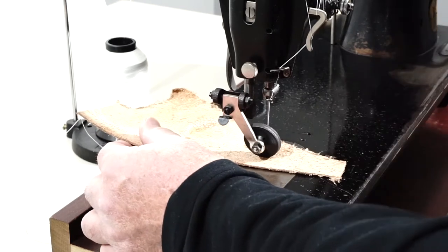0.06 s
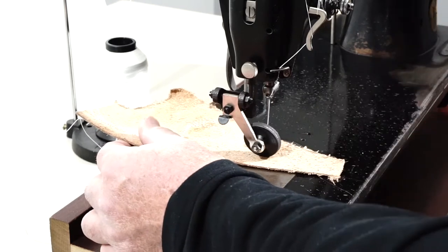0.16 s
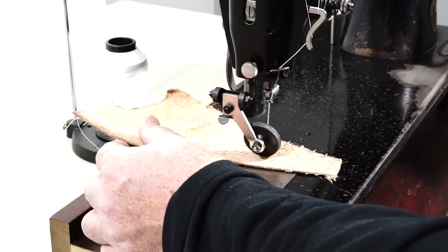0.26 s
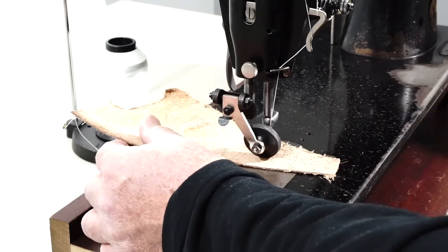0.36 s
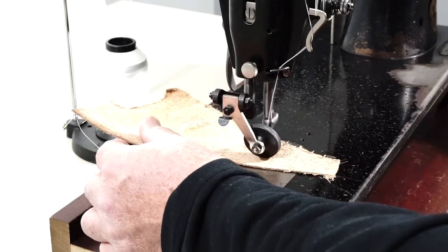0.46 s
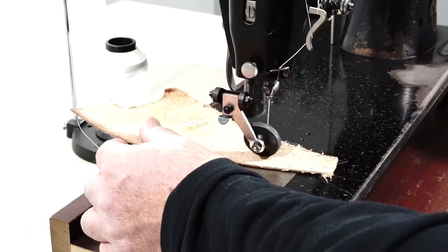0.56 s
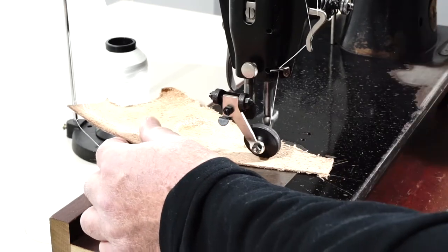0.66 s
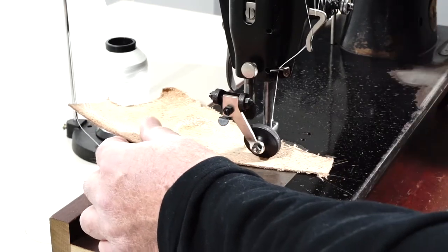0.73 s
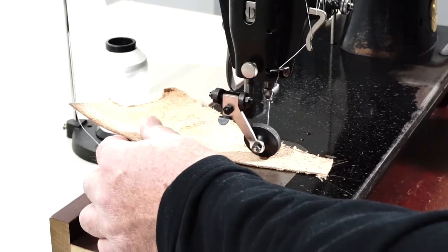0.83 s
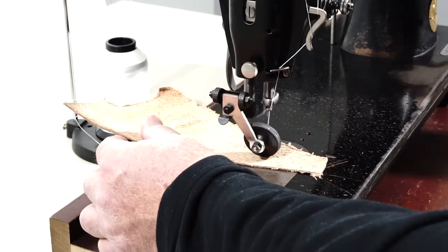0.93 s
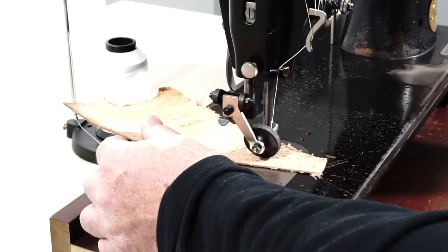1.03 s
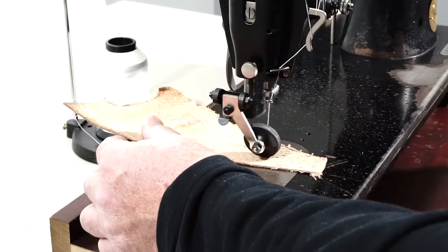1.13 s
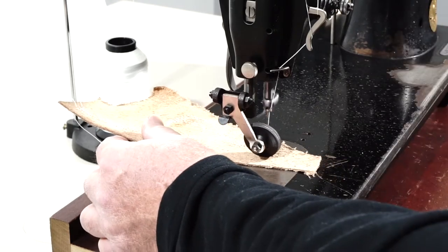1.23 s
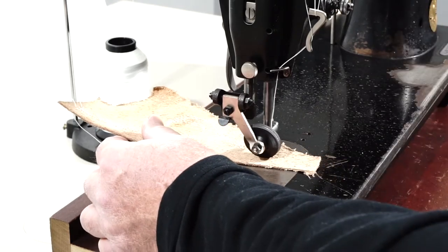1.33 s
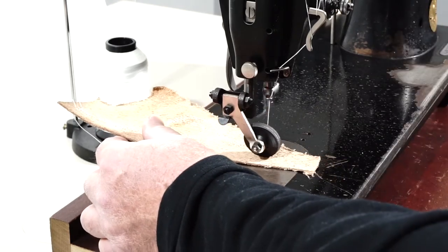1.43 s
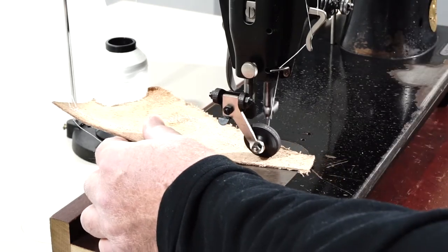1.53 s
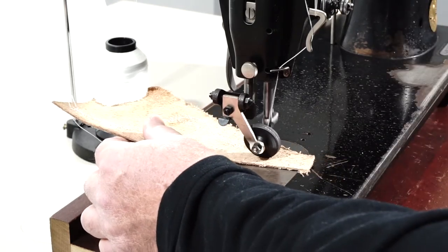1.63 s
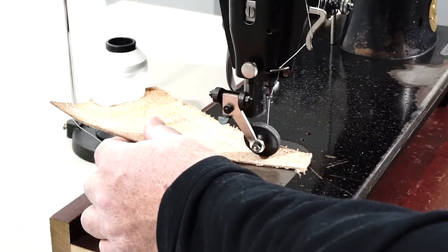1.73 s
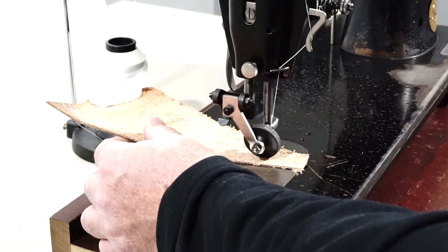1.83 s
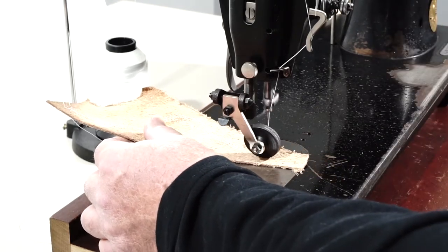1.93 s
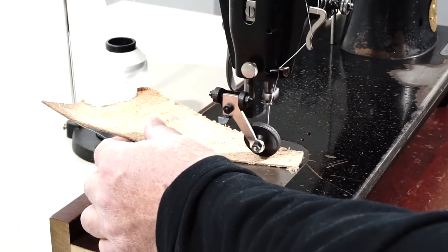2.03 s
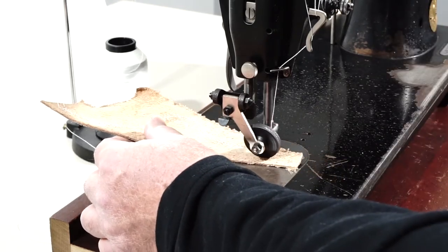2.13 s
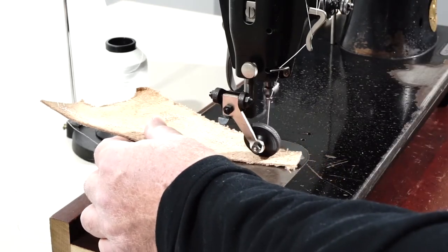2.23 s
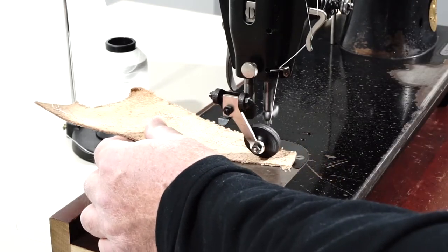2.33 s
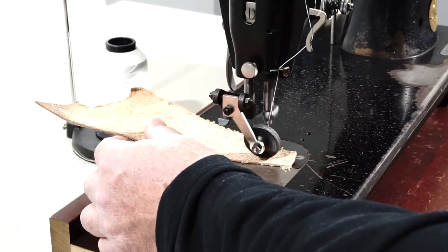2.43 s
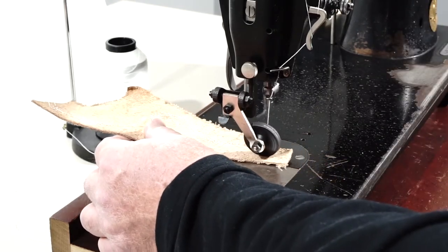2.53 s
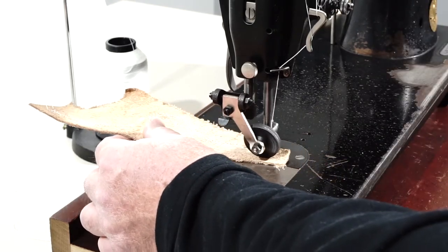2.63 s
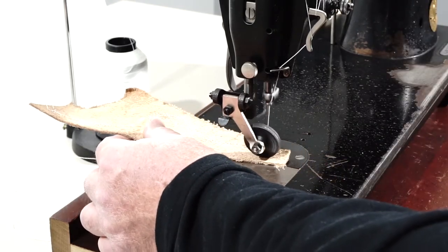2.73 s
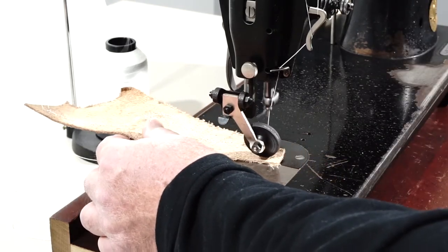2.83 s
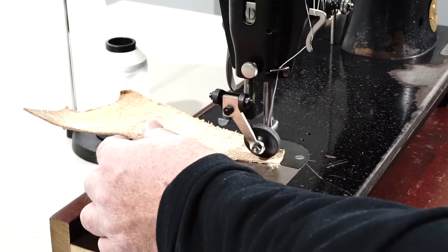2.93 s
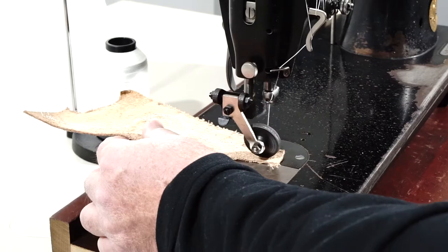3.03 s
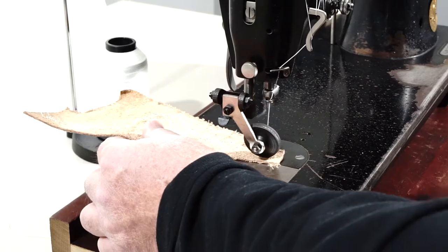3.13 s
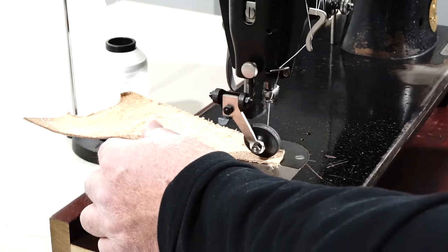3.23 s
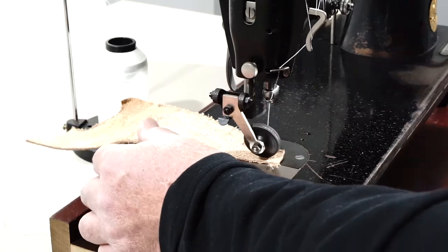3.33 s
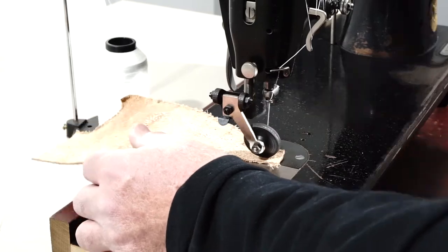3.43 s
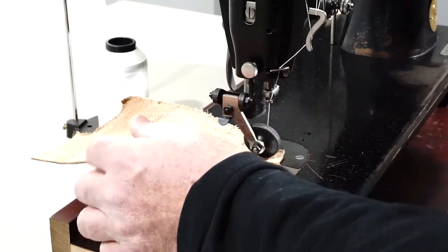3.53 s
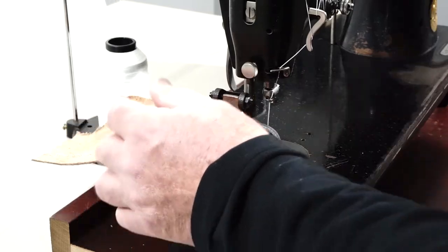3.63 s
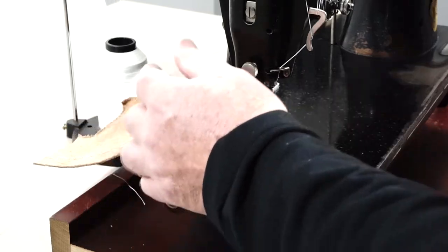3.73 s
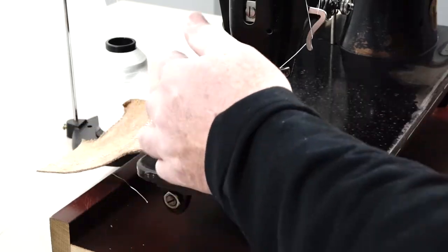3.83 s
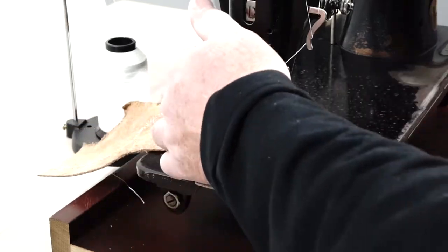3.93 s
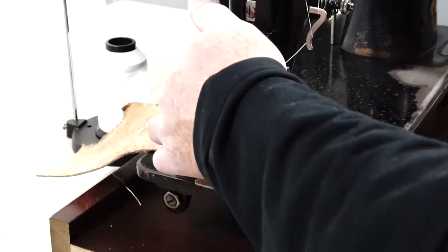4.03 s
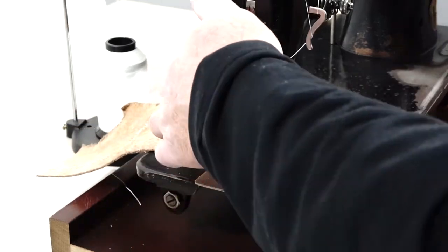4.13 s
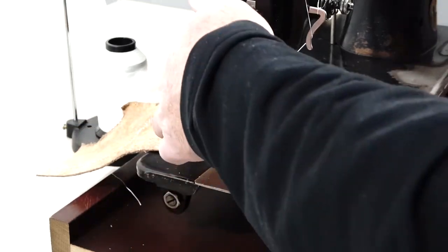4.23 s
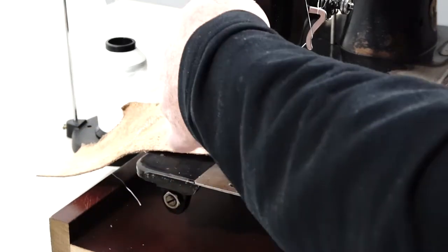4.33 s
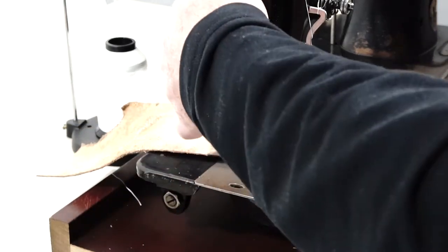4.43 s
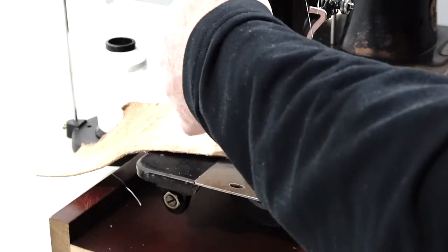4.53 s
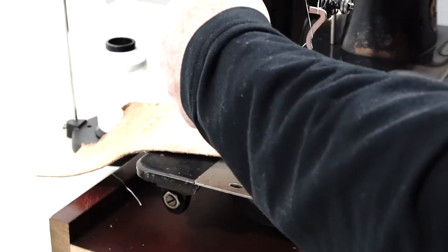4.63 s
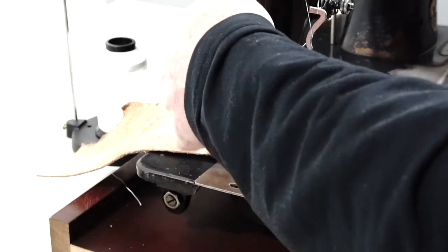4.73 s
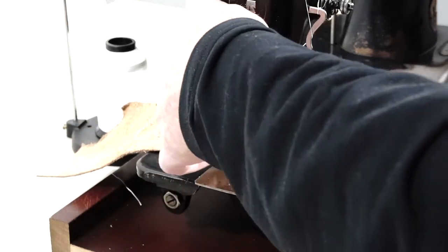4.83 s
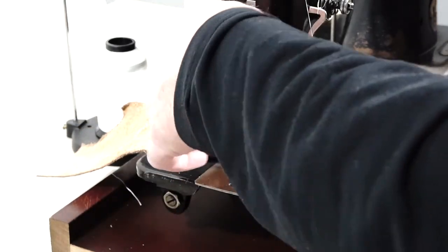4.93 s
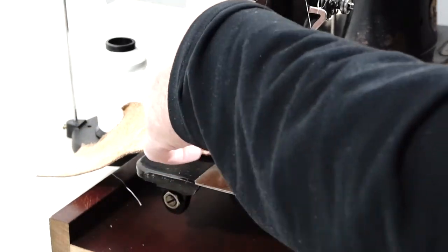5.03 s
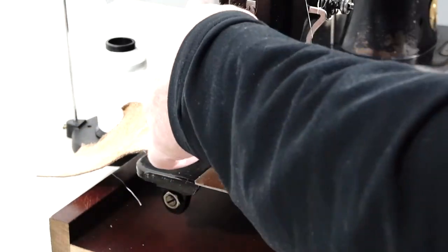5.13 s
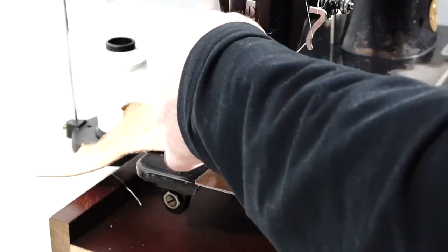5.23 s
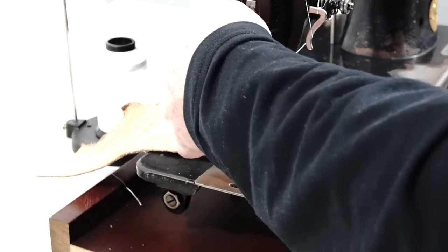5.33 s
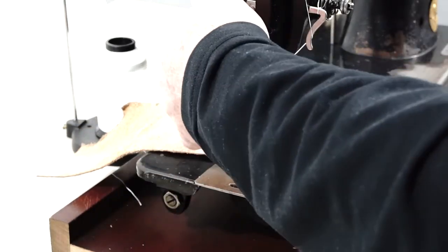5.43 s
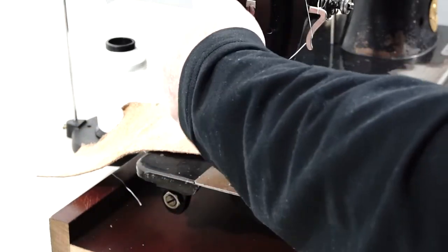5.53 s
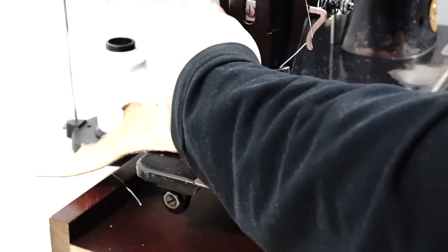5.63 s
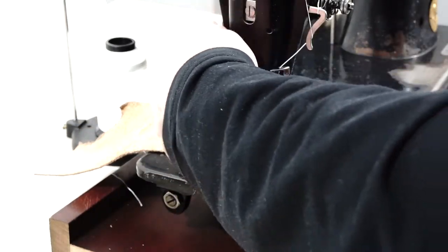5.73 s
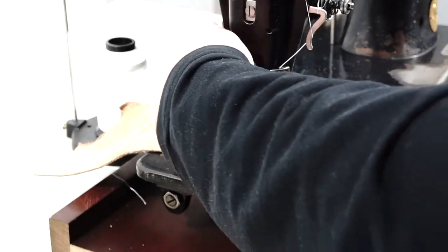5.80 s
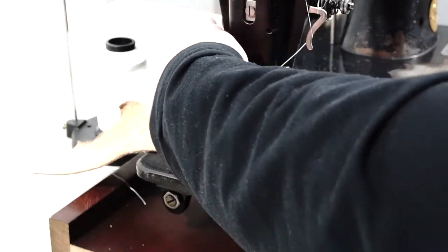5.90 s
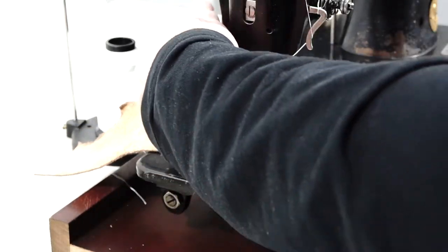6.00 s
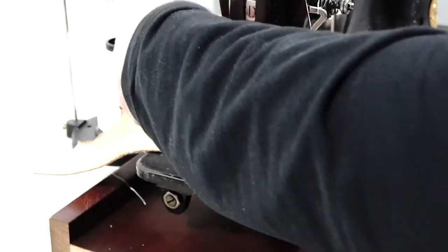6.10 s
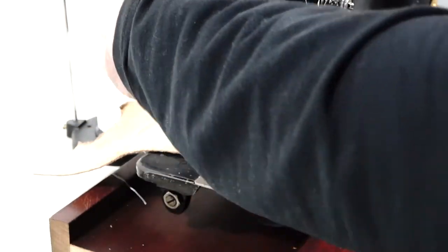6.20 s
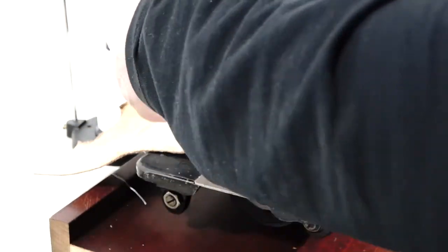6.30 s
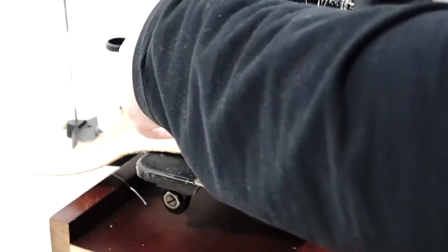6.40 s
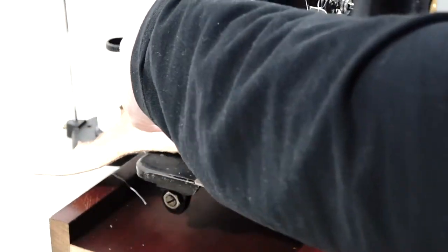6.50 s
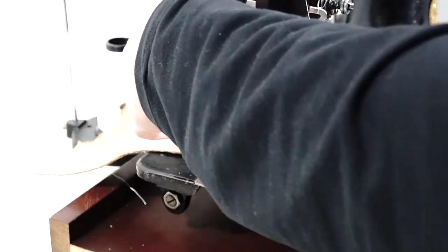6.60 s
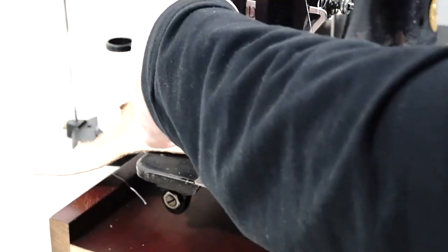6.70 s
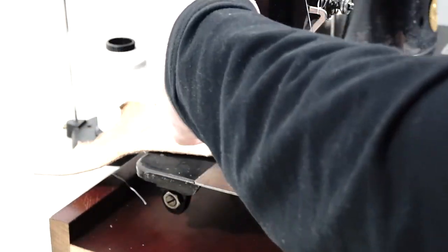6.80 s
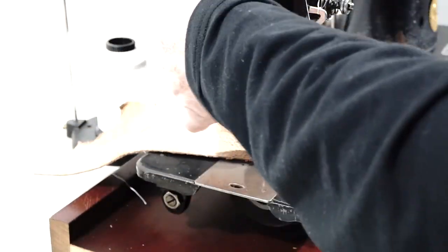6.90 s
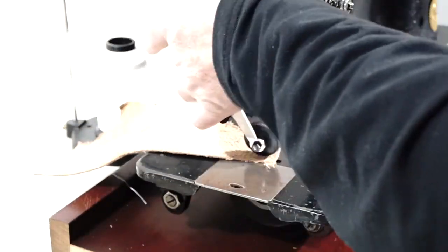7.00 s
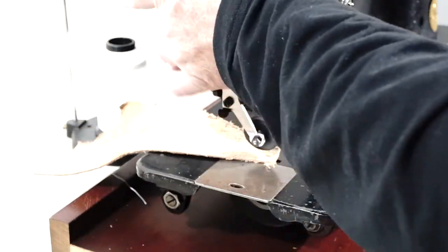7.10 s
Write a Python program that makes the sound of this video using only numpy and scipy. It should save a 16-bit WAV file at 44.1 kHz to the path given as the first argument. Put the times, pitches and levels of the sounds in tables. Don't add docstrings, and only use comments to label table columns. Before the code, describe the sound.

A heavy sewing machine clatters through leather at about four stitches a second, brakes with a metallic clank, then hand knocks and quiet rumble follow.

```python
import sys
import numpy as np
from scipy import signal
from scipy.fft import rfft, irfft, next_fast_len
from scipy.io import wavfile

SR = 44100
rng = np.random.default_rng(int(sys.argv[2]) if len(sys.argv) > 2 else 0)


def wrap_up_sound(samples):
    columns = np.atleast_2d(samples).T
    tamed = np.clip(columns, -1, 1)
    steps = np.round(tamed * 32767).astype(np.int16)
    wavfile.write(sys.argv[1], SR, steps)


def invert_db(level):
    return 10 ** (np.asarray(level, dtype=float) / 20)


N = 315756
T = np.arange(N) / SR
RUNNING = round(3.3 * SR)


def rms_one(x):
    return x / np.sqrt(np.mean(x ** 2) + 1e-20)


def in_time(rows):
    s, *columns = np.transpose(rows)
    return [np.interp(T, s, c) for c in columns]


def gate(start_s, stop_s, fade_s):
    return np.clip(np.minimum(T - start_s, stop_s - T) / fade_s + 1, 0, 1) ** 2


def stroke(s, db, hold, rise, fall, t=T):
    before = (s - t) / max(rise, 1e-3)
    after = (t - s - hold) / max(fall, 1e-3)
    return invert_db(db - 20 * np.maximum(np.maximum(before, after), 0))


def strokes(table):
    return sum(stroke(*row) for row in table)


def on_log_axis(hz, points):
    table_hz, values = np.transpose(points)
    return np.interp(np.log(hz), np.log(table_hz), values)


def at_hz(points, size):
    return on_log_axis(np.maximum(np.fft.rfftfreq(size, 1 / SR), 1), points)


def band_pass(order, low_hz, high_hz, x):
    return signal.sosfilt(signal.butter(order, [low_hz, high_hz], "band", fs=SR, output="sos"), x)


def colour(x, points):
    size = next_fast_len(x.shape[-1])
    return rms_one(irfft(rfft(x, size) * invert_db(at_hz(points, size)), size)[..., :x.shape[-1]])


def drift(rate_hz, size=N):
    r = np.exp(-80 * np.pi * rate_hz / SR)
    slow = signal.lfilter([1], [1, -2 * r, r * r], rng.standard_normal(size // 40 + 2002))[2000:]
    return np.interp(np.arange(size) / 40, np.arange(len(slow)), rms_one(slow))


def grains(per_s, spread_db, size=N):
    sizes = invert_db(spread_db * np.minimum(rng.exponential(1, size), 5)) * rng.standard_normal(size)
    return rms_one(sizes * (rng.random(size) < per_s / SR))


def resonate(x, peaks, flicker_db):
    out = 0
    for k, (hz, width_hz, db) in enumerate(peaks):
        r, w = np.exp(-np.pi * width_hz / SR), 2 * np.pi * hz / SR
        rung = rms_one(signal.lfilter([1, 0, -1], [1, -2 * r * np.cos(w), r * r], x))
        out = out + (-1) ** k * invert_db(db + flicker_db * drift(9.2, size=len(x))) * rung
    return rms_one(out)


def clicks_at(times, dbs):
    clicks = np.full(N, 1e-18)
    clicks[np.round(times * SR).astype(int)] = invert_db(dbs)
    return clicks


def until_dead(times):
    return slice(int(min(times) * SR), int((max(times) + .5) * SR))


def strike(times, dbs, modes, scatter_db, clatter_s, loose=1):
    out, luck = np.zeros(N), rng.standard_normal((len(times), len(modes)))
    heard = until_dead(times)
    fall, rough = invert_db(-60 / (clatter_s * SR)), rng.standard_normal(len(out[heard]))
    for k, (hz, db, t60) in enumerate(modes):
        clicks = clicks_at(times, dbs + db + scatter_db * luck[:, k])[heard]
        decay = signal.lfilter([np.sqrt(1 - fall ** 2)], [1, -fall], clicks)
        clatter = clicks + decay * rough * loose
        r, w = invert_db(-60 / (t60 * SR)), 2 * np.pi * hz / SR
        out[heard] += signal.lfilter([0, np.sin(w)], [1, -2 * r * np.cos(w), r * r], clatter)
    return out


def burst(times, dbs, low_hz, high_hz, t60):
    out, heard = np.zeros(N), until_dead(times)
    fall = signal.lfilter([1], [1, -invert_db(-60 / (t60 * SR))], clicks_at(times, dbs)[heard])
    noise = rng.standard_normal(len(fall))
    out[heard] = fall * rms_one(band_pass(2, low_hz, min(high_hz, .45 * SR), noise))
    return out


# (frequency [Hz], width [Hz], level [dB])
TABLE_MODES = [(166, 47, -7), (211, 19, -2.5)]
# (time [s], level [dB], hold [s], rise [s per 20 dB], fall [s per 20 dB])
CLUTCH_JOLT = (-0.04, -41.5, 0.32, 2, 0.7)


def table_boom(turns, peak_db, teeth):
    main_share, hold, rise, fall = 0.46, 0.093, 0.13, 0.19
    fore_share, fore_db = 0.24, -6.5
    t = T[:RUNNING]
    push = 0
    for k, db in enumerate(peak_db):
        push = push + stroke(k + main_share, db, hold, rise, fall, t=turns)
        push = push + stroke(k + fore_share, db + fore_db, 0, rise, rise, t=turns)
    phase = 2 * np.pi * np.cumsum(129 + 2.5 * drift(3.1, size=RUNNING)) / SR
    boom = (push + stroke(*CLUTCH_JOLT, t=t)) * np.sin(phase)
    boom = band_pass(3, 112, 155, boom)
    boom = boom + invert_db(-9.0) * push * resonate(teeth, TABLE_MODES, flicker_db=5.5)
    return boom + invert_db(-9.5) * push * np.sin(2 * np.pi * 205 * t)


# (time [s], motor load [dB], gear speed as rattle [dB])
RUN_UP = [(0.0, -24, -39.5), (0.06, -35, -48.5), (0.15, -42, -53.5), (0.28, -33.5, -41.5),
          (0.55, -36, -35.5), (1.3, -38.5, -36.5), (1.6, -37, -35.5), (2.4, -36, -34.5), (2.95, -37, -36),
          (3.03, -42, -36.5), (3.15, -64, -41), (3.2, -54, -67)]
# (time of snap [s], snap [dB], thread pull [dB], table boom [dB])
STITCHES = [(0.5913, 1.5, -7, -38.5), (0.8828, -2, 1, -41.5), (1.1905, 0.5, -1, -36.5), (1.478, -1, 2, -30),
            (1.7511, 0, 1.5, -31), (2.0158, -0.5, -5.5, -34.5), (2.277, 0, -1.5, -30), (2.539, 1, -7, -29),
            (2.801, -1.5, -3, -32), (3.064, 5, 0, -80)]
# (frequency [Hz], width [Hz], level [dB])
DRIVE_MODES = [(603.2, 12, -1), (648, 26, -1), (729, 60, -1), (752, 20, -8), (584.6, 27, -10),
               (627.3, 22, -7)]
CASTING_MODES = [(207, 11, -3), (246.4, 10.4, -3), (381, 16, -7.5), (415, 20, 1), (484.3, 15, -2.5),
                 (851, 29, 0), (934, 35, -19), (1117, 21, -13), (1152, 23, -7.5)]
SHUTTLE_MODES = [(2280, 50, 0), (2650, 44, 5), (3740, 57, 3), (6600, 37, 3), (8400, 100, -6)]
WHINE_MODES = [(3445, 55, 1), (3510, 55, 1), (3188, 30, -7), (6496, 20, -4)]
# (frequency [Hz], density [dB per Hz])
RUMBLE_SPECTRUM = [(18, -67), (30, -28), (85, -23), (125, 2.5), (308, -7), (413, 0), (544, -6.5),
                   (618, -5.5), (876, -3.5), (1170, -3), (1380, -19.5), (2400, -21), (3120, -25),
                   (5280, -120)]
RATTLE_SPECTRUM = [(820, -26), (1400, -5.5), (1770, 1.5), (2890, -1.5), (3430, -0.5), (4010, -3),
                   (6960, 2.5), (10500, -2.5), (11000, -4), (14300, -50), (22000, -120)]


def running_gear():
    drive_db, rattle_db = np.array(in_time(RUN_UP))[:, :RUNNING]
    s, _, pull_db, peak_db = np.transpose(STITCHES)
    turns = np.interp(T[:RUNNING], s, np.arange(len(s)), left=-.5)
    share, stitch = turns % 1, turns.astype(int)
    load = np.exp(-((share - 0.18) / 0.028) ** 2) * invert_db(pull_db[stitch])
    shake = np.exp(-(((share - 0.022 + .5) % 1 - .5) / 0.13) ** 2)
    teeth = grains(3000, spread_db=2.5, size=RUNNING)
    chatter = grains(9000, spread_db=0.0, size=RUNNING)

    drive = invert_db(drive_db - 1.0 + 2 * load) * resonate(teeth, DRIVE_MODES, flicker_db=3.0)

    speed_db = rattle_db - rattle_db.max()
    rumble = resonate(teeth, CASTING_MODES, flicker_db=4.0)
    rumble = rumble + invert_db(1.0) * colour(teeth + chatter, RUMBLE_SPECTRUM)
    rumble = invert_db(-41 + 0.28 * speed_db + 2 * load) * rumble

    rattle = invert_db(-17.5) * resonate(chatter, SHUTTLE_MODES, flicker_db=4.0)
    rattle = rattle + invert_db(drift(16, size=RUNNING)) * colour(chatter, RATTLE_SPECTRUM)
    rattle = rattle + invert_db(-10) * resonate(chatter, WHINE_MODES, flicker_db=1.5)
    rattle = invert_db(rattle_db + 2.5 * shake) * rattle

    gear = table_boom(turns, peak_db, teeth) + drive + rumble + rattle
    return gate(0, 3.057, 0.11) * np.pad(gear, (0, N - RUNNING))


# (frequency [Hz], level under load [dB], level idling [dB])
MAINS_LINES = [(120.5, -64, -78), (241, -56, -74), (361.5, -60, -76), (603, -55, -68)]


def windings():
    load = gate(0, 3.05, 0.097)
    hum = 0
    for hz, load_db, idle_db in MAINS_LINES:
        level = (invert_db(idle_db) + load * invert_db(load_db)) * invert_db(2.5 * drift(3))
        phase = 2 * np.pi * np.cumsum(hz * (1 + .003 * drift(2))) / SR
        hum = hum + np.sqrt(2) * level * np.sin(phase)
    return hum


# (time [s], level [dB], frequency [Hz], T60 [s])
PINGS = [(.001, -27, 620, .15), (.032, -28, 600, .12), (.122, -32, 610, .08), (.272, -30, 640, .08),
         (.275, -32, 415, .2), (4.72, -52, 620, .1), (3.495, -38, 600, .08), (3.497, -41, 850, .08),
         (3.685, -44, 400, .12), (3.705, -44, 340, .12), (3.81, -50, 415, .2), (3.81, -40, 1028, .09),
         (3.81, -46, 1690, .05), (3.948, -39, 410, .6), (3.957, -46, 754, .4), (3.957, -47, 635, .25),
         (3.957, -42, 1152, .15), (4.032, -45, 1152, .12), (6.062, -35, 385, .1), (6.062, -40, 1136, .1),
         (6.16, -41, 400, .12), (6.955, -39, 240, .4), (6.916, -36, 400, .1), (6.915, -36, 1130, .12),
         (.008, -42, 1860, .35), (.004, -44, 2210, .3), (3.032, -23, 3705, .13), (3.1, -35, 3700, .24),
         (3.685, -44, 360, .12), (.19, -42, 3450, .035), (.285, -33, 2300, .04), (.408, -29, 2800, .05),
         (.41, -31, 2060, .08), (.716, -38, 3050, .04), (1.022, -34, 3080, .045), (3.809, -44, 7000, .02),
         (4.176, -60, 3600, .03), (4.332, -45, 1690, .05), (4.352, -52, 1700, .06),
         (3.812, -45, 3500, .07), (3.962, -42, 2320, .07), (3.034, -36, 4000, .3), (3.03, -27, 2150, .08),
         (1.31, -40, 4100, .04), (1.4, -32, 3070, .04), (1.024, -34, 2500, .04), (0.67, -39, 4300, .04),
         (1, -37, 3730, .04), (1.092, -34, 4800, 0.045), (.935, -32, 2170, .07), (1.4, -30, 1900, 0.13),
         (.273, -27.5, 730, 0.089), (0.36, -28, 690, .06), (.535, -29.5, 620, 0.11), (2.31, -32, 415, 0.17),
         (2.05, -33, 420, .25), (4.7, -48, 640, .06), (4.334, -50, 2350, 0.046), (4.334, -57, 3900, .025),
         (6.507, -40, 3180, .04), (6.915, -48, 5150, .04), (6.061, -52, 4800, 0.078)]


def single_rings():
    return sum(strike(np.array([s]), db, [(hz, 0, t60)], scatter_db=-0.5, clatter_s=0.0061, loose=0.3)
               for s, db, hz, t60 in PINGS)


# (frequency [Hz], level [dB], T60 [s])
FRAME_MODES = [(1030, -6, .06), (1095, -3, .09), (1146, -0.5, .09), (1205, -6, .05)]
BED_MODES = [(207, -8, .12), (243, -5, .18), (310, -10, .1), (377, -3, .14), (414, -1, .18), (490, -5, .12),
             (560, -8, .1), (625, -3, .14), (750, -3, .14), (860, -8, .1)]
LINK_MODES = [(2300, -2, .03), (2660, 0, .035), (3180, 0, .035), (3470, -9, .03), (4500, 0, .02),
              (5100, -2, .03)]


def blows(table, snap_t60, clack_t60, loose_db):
    s, frame_db, bed_db, link_db, snap_db = np.transpose(table)
    frame = strike(s, frame_db - 10, FRAME_MODES, scatter_db=1.5, clatter_s=.045)
    frame = frame + burst(s, frame_db - 11, 780, 1350, .09)
    bed = strike(s + 0.00407, bed_db - 8.5, BED_MODES, scatter_db=2.5, clatter_s=0.07)
    bed = bed + burst(s, bed_db - 14.5, 270, 900, 0.34)
    clack = strike(s, link_db - 18.0, LINK_MODES, scatter_db=-4.0, clatter_s=0.017)
    clack = clack + burst(s, link_db + loose_db, 2070, 4550, clack_t60)
    snap = burst(s, snap_db, 5800, 21000, snap_t60) + burst(s, snap_db + 6, 10440, 15700, 0.043)
    return frame + bed + clack + snap


# (time [s], frame ring [dB], bed thud [dB], link clack [dB], shuttle snap [dB])
FIRST_STITCH = [(0.122, -44, -31.5, -39, -33.5), (0.188, -40, -36, -34, -37.5),
                (0.2571, -32, -32, -47, -35.5), (0.2834, -31, -31.5, -36, -44),
                (0.4086, -38, -59, -30.5, -46), (0.4825, -27, -30.5, -30, -33)]
# (share of cycle [1], frame ring [dB], bed thud [dB], link clack [dB], snap [dB])
CATCH = [(0, -26, -58, -32, -22.5), (.03, -33, -58, -36.5, -28.5), (.08, -35.5, -67, -37, -42.5),
         (.43, -35, -34.5, -33, -49), (.61, -30, -37.5, -39, -34.5), (.66, -37, -40, -38, -34.5),
         (.97, -37, -47, -40.5, -34)]
PULL = [(.142, -24.5, -36, -36.5, -31), (.228, -25, -33, -35.5, -39), (.3, -42, -40.5, -47, -49)]


def stitch_contacts():
    play_s, play_db = .0015, 2.0
    rows = []
    for (s, snap_db, pull_db, _), after in zip(STITCHES, STITCHES[1:]):
        for contacts, db in ((CATCH, snap_db), (PULL, pull_db)):
            for share, *dbs in contacts:
                rows.append((s + share * (after[0] - s), *(np.array(dbs) + db)))
    play = rng.standard_normal((len(rows), 5)) * [play_s, play_db, play_db, play_db, play_db]
    play[::len(CATCH + PULL)] = 0
    return blows(np.vstack([FIRST_STITCH, rows + play]), snap_t60=0.048, clack_t60=0.12, loose_db=-3.0)


# (share of cycle [1], level [dB], frequency [Hz], T60 [s])
ARM_MODES = [(.15, -29.5, 417, 0.24), (.2, -29.5, 1146, 0.12), (.2, -32, 670, 0.095),
             (0.029, -39, 3790, .06)]
ARM_LOW_DB = [-1, 1.5, 2.5, 0.5, -2, 0.5, 3, -11, 1]


def arm():
    s, _, pull_db, _ = np.transpose(STITCHES)
    out = 0
    for k, (share, db, hz, t60) in enumerate(ARM_MODES):
        stitch_db = pull_db[:-1] if k else np.array(ARM_LOW_DB)
        times = s[:-1] + share * np.diff(s)
        out = out + strike(times, db + stitch_db, [(hz, 0, t60)], scatter_db=1.0, clatter_s=0.028, loose=0.41)
    return out


# (time [s], peak level [dB])
BRAKE_HITS = [
    (3.028, -16.5),
    (3.034, -19),
    (3.078, -25.5),
    (3.118, -31),
]
# (frequency [Hz], level [dB], T60 [s])
BRAKE_MODES = [(834, 1, 0.25), (880, -3.5, 0.23), (930, -16, .15), (944, -0.5, 0.27), (1040, -1.5, 0.18),
               (1090, -2, 0.32), (1110, -20, .14), (1507, -5.5, 0.18), (1820, -12, 0.17), (2155, 2, 0.069),
               (2250, -7, .15), (2330, -12, .2), (2530, -2.5, 0.082), (2650, -8, 0.18), (3144, -16, .2),
               (3420, -6, 0.15), (3830, -12, 0.2), (4470, -14, 0.16), (4700, -10, .1)]


def brake():
    s, db = np.transpose(BRAKE_HITS)
    clang = strike(s, db - 15.0, BRAKE_MODES, scatter_db=0.5, clatter_s=0.026, loose=0.77)
    return clang + burst(s, db - 15.0, 910, 1380, 0.24) + burst(s, db - 15.5, 1700, 3750, 0.22)


# (time [s], level [dB], hold [s], rise [s per 20 dB], fall [s per 20 dB])
BELT_SLAPS = [(3.2, -55, 0.22, 0.28, 0.25), (3.58, -61, .05, 0.21, .3), (4.08, -56, .02, 0.39, 0.42),
              (4.53, -53, 0.2, 0.13, 0.6), (5.12, -48.5, 0.25, 0.4, 0.74), (6.22, -51, .03, 0.71, .4)]
# (time [s], level [dB])
TRAFFIC = [(3.1, -55), (3.3, -64.5), (3.55, -55.5), (3.95, -52), (4.25, -62.5), (4.6, -63.5), (4.95, -61),
           (5.35, -56), (5.8, -54), (6.15, -51), (6.9, -49.5), (7.16, -49.5)]
# (frequency [Hz], density [dB per Hz])
OUTSIDE_LOW = [(15, -77), (25, -47), (43, -28), (75, -28.5), (108, -12.5), (233, -9), (371, -10.5),
               (644, -6), (800, -25), (1040, -42), (1760, -120)]
OUTSIDE_HIGH = [(350, -31), (600, -6), (1020, -7), (1200, -5), (1380, -9), (1580, -4), (1900, -10),
                (2880, -20), (3970, -26), (5000, -33), (6500, -69), (11000, -120)]


def workshop_air():
    mean_db, low_follows, idle_db = -51, 0.76, -68
    high_db, = in_time(TRAFFIC)
    low_db = mean_db + low_follows * (high_db - mean_db)
    housing = [(637, 7.5, 3.5), (589, 11, -4.5), (616, 15, -4)]   # (Hz, width Hz, dB)
    hum = resonate(rng.standard_normal(N), housing, flicker_db=-1.5)
    motor = invert_db(-5.5) * (invert_db(idle_db) + strokes(BELT_SLAPS)) * hum
    low = invert_db(low_db - 0.5 + 0.76 * drift(4.1)) * colour(rng.standard_normal(N), OUTSIDE_LOW)
    high = invert_db(high_db + .8 * drift(7.2)) * colour(rng.standard_normal(N), OUTSIDE_HIGH)
    return gate(3.1, 8, 0.3) * (motor + low + high)


# (time [s], level [dB], hold [s], rise [s per 20 dB], fall [s per 20 dB])
PUSHES = [(3.45, -53.5, 0.029, 0.11, .05), (3.497, -46, 0.049, 0.022, 0.15),
          (3.724, -63, .005, 0.029, 0.082)]
# (frequency [Hz], density [dB per Hz])
PUSH_SPECTRUM = [(150, -41), (250, -9.5), (518, -4), (561, -2), (782, -4.5), (1090, -7), (1700, -14),
                 (2600, -10), (3250, -20.5), (11000, -35), (14300, -52), (22000, -120)]
DRAGS = [(3.924, -50, .01, 0.49, 0.35), (4.34, -74, 0.23, .03, .1), (5.71, -64.5, 0.15, 0.16, 1),
         (6.501, -52, .01, .01, 0.36), (7.16, -54.5, .01, 0.17, 0.12)]
# (frequency [Hz], density [dB per Hz])
DRAG_SPECTRUM = [(470, -39), (800, -4), (1140, -1), (1430, -14), (2370, -8.5), (2850, -16), (4140, -14.5),
                 (11000, -22.5), (14300, -55), (22000, -120)]
SQUEAK = (5.66, -73, .16, .06, .12)
# (frequency [Hz], width [Hz], level [dB])
SQUEAK_MODES = [(4000, 70, 0), (4180, 80, -6)]


def leather():
    push_rub = colour(grains(9000, spread_db=-1.0), PUSH_SPECTRUM)
    push = strokes(PUSHES) * invert_db(5.5 + 0.96 * drift(30.5)) * push_rub
    drag_rub = colour(grains(9000, spread_db=-1.0), DRAG_SPECTRUM)
    drag = strokes(DRAGS) * invert_db(-1.0 + 4.0 * drift(29)) * drag_rub
    squeak = stroke(*SQUEAK) * resonate(grains(3000, spread_db=2), SQUEAK_MODES, flicker_db=.3)
    return push + drag + squeak


# (time [s], frame ring [dB], bed thud [dB], link clack [dB], snap [dB])
KNOCKS = [(3.495, -34, -42, -55, -54), (3.685, -51, -46, -55, -66), (3.7238, -39, -40, -47, -43),
          (3.8082, -37, -41, -34.5, -37.5), (3.8499, -43, -50, -46, -55), (3.9424, -40, -45, -38, -38.5),
          (3.95, -37, -41.5, -39, -45), (3.9644, -35, -38, -38, -43.5), (4.032, -42, -43.5, -48, -56),
          (4.1194, -64, -48, -64, -68), (4.173, -84, -59, -51.5, -57), (4.3305, -44, -55, -50.5, -46),
          (5.2416, -58, -59, -65, -79), (6.0594, -28.5, -33, -34, -72), (6.1602, -36, -35.5, -53, -57),
          (6.2664, -44, -43, -53, -64), (6.3647, -55, -41, -65, -68), (6.5056, -27.5, -36, -24.5, -48.5),
          (6.914, -23.5, -30.5, -32.5, -75), (7.1087, -38, -44, -41, -49), (7.124, -36.5, -57, -49, -48)]
# (time [s], level [dB], low edge [Hz], high edge [Hz], T60 [s])
TAILS = [(6.062, -57, 2200, 5200, .3), (6.507, -46, 1500, 5200, 0.38), (6.916, -58, 4700, 5300, 0.33),
         (3.8, -52, 400, 2600, 0.37), (3.812, -47, 2200, 4400, 0.33)]


def hand_knocks():
    out = blows(KNOCKS, snap_t60=0.1, clack_t60=0.055, loose_db=-5.0)
    for s, db, low_hz, high_hz, t60 in TAILS:
        out = out + burst(np.array([s]), db, low_hz, high_hz, t60)
    return out


def echoes(length_s, t60_points, count):
    t, out = T[:round(length_s * SR)], 0
    for hz in 90 * 2 ** np.arange(7.5):
        t60 = on_log_axis(hz, t60_points)
        octave = band_pass(1, hz / np.sqrt(2), hz * np.sqrt(2), rng.standard_normal((count, len(t))))
        out = out + octave * invert_db(-60 * t / t60) / np.sqrt(t60)
    return out / np.sqrt(np.sum(out ** 2, axis=-1, keepdims=True))


def through(x, tails, size):
    turn, count = T / .07, len(tails)
    out = 0
    for k, tail in enumerate(tails):
        away = np.abs((turn - k + count / 2) % count - count / 2)
        out = out + rfft(x * np.cos(np.pi / 2 * np.minimum(away, 1)), size) * rfft(tail, size)
    return out


# (frequency [Hz], T60 [s])
SHOP_T60 = [(100, 0.53), (1000, 0.72), (4000, 0.69), (11000, 0.11)]


def workshop_echo(machine):
    size = next_fast_len(N + SR)
    return irfft(through(machine, echoes(.7, SHOP_T60, count=5), size), size)[:N]


# (frequency [Hz], side minus mid [dB])
SPREAD = [(60, -30), (130, -35), (220, -19.5), (450, -13), (1000, -10), (2000, -6.5), (4000, -5.5),
          (8000, -2)]
# (frequency [Hz], left minus right [dB])
LEAN = [(60, 4), (110, -0.5), (190, 0), (340, 0), (610, 0.8), (1100, 0.5), (1960, -1), (3510, -0.5),
        (6280, 1), (11200, 3)]


def ports(mid, left_lead_samples, count):
    size = next_fast_len(N + SR // 2)
    tails = echoes(.4, [(100, .3), (11000, .3)], count=count)
    scatter = through(mid, tails, size) * invert_db(at_hz(SPREAD, size))
    lead = np.exp(1j * np.pi * np.fft.rfftfreq(size) * left_lead_samples)
    lean = invert_db(at_hz(LEAN, size) / 2) * lead
    direct = rfft(mid, size)
    return irfft(np.array([(direct + scatter) * lean, (direct - scatter) / lean]), size)[:, :N]


# (frequency [Hz], density [dB per Hz])
HISS_SPECTRUM = [(1470, -41), (2500, -5.5), (5040, -6.5), (5260, -8), (11000, -6), (14300, -42),
                 (22000, -120)]


def microphone_hiss():
    return invert_db(-64.5) * colour(rng.standard_normal((2, N)), HISS_SPECTRUM)


def scene():
    hits = single_rings() + stitch_contacts() + arm() + brake() + hand_knocks()
    no_bass = signal.butter(4, 150, "high", fs=SR, output="sos")
    machine = running_gear() + windings() + signal.sosfilt(no_bass, hits) + leather()
    near = ports(machine + invert_db(-6.5) * workshop_echo(machine), left_lead_samples=0.68, count=7)
    return near + ports(workshop_air(), left_lead_samples=6.1, count=2) + microphone_hiss()


def low_pass(x):
    return signal.sosfilt(signal.butter(12, 11760, fs=SR, output="sos"), x)


def record(dry):
    cutoff_hz = 11000
    elliptic = signal.ellip(10, .2, 33, cutoff_hz, fs=SR, output="sos")
    chebyshev = signal.cheby1(12, .5, cutoff_hz, fs=SR, output="sos")
    mix = signal.sosfilt(np.vstack([elliptic, chebyshev]), dry)
    return low_pass(mix)


dry = scene()
out = record(dry)
wrap_up_sound(out)
```